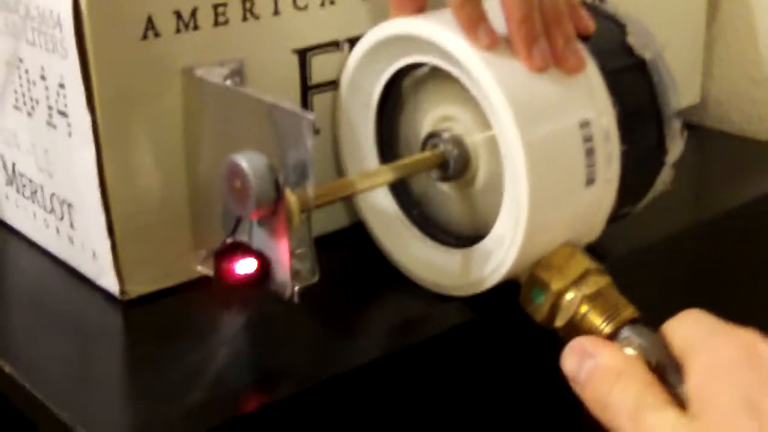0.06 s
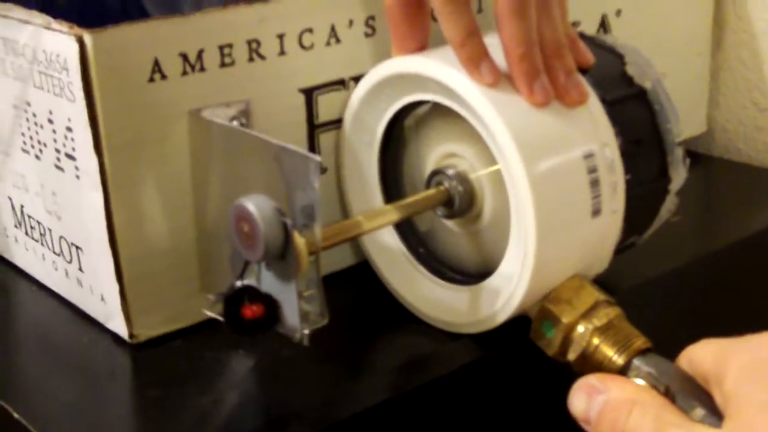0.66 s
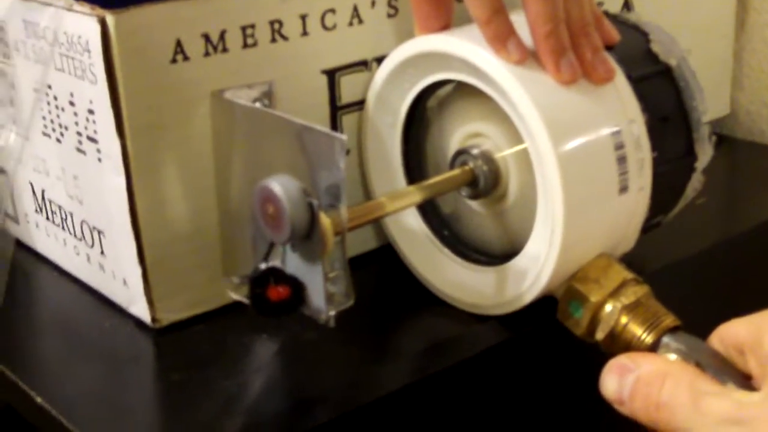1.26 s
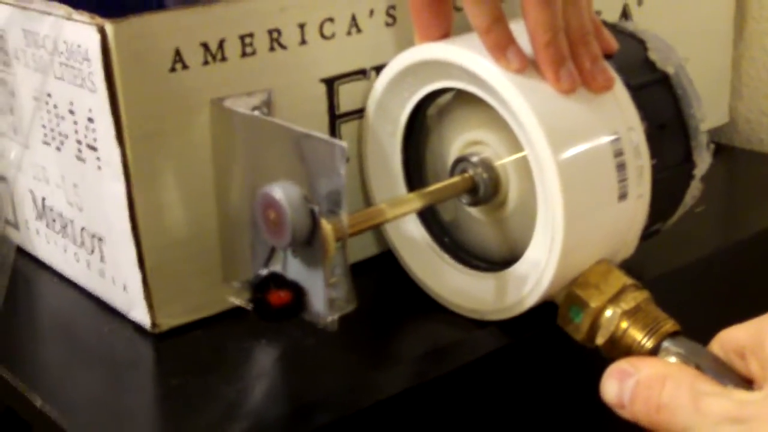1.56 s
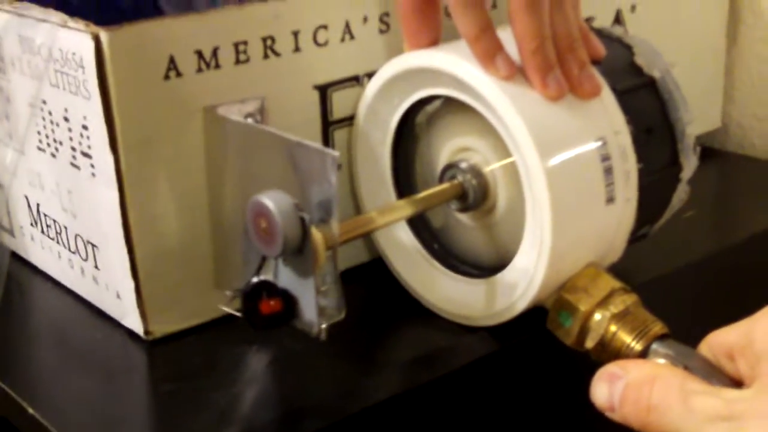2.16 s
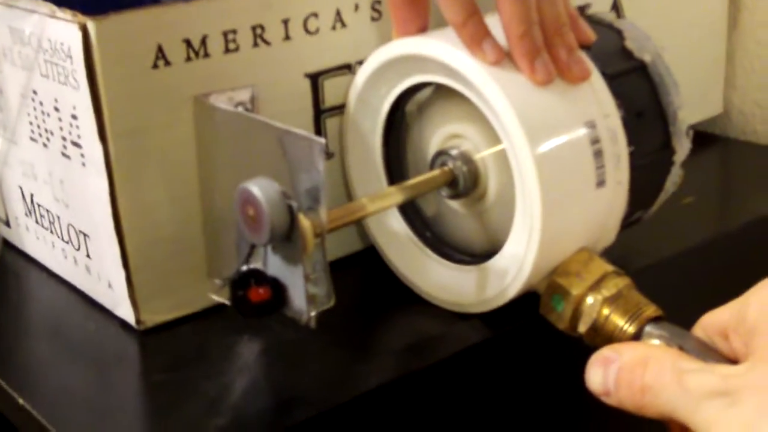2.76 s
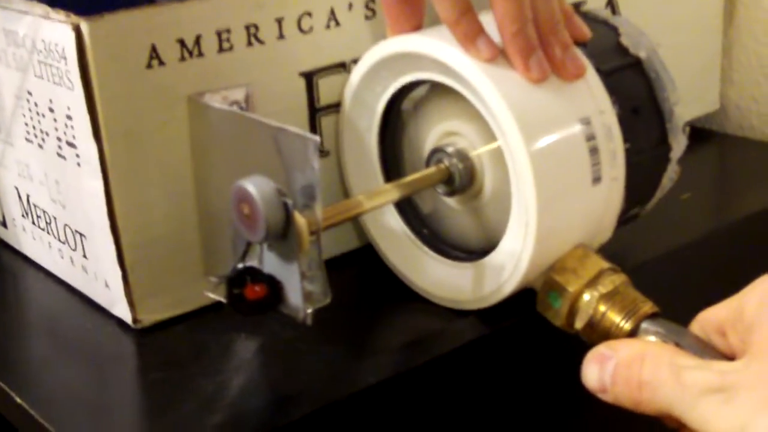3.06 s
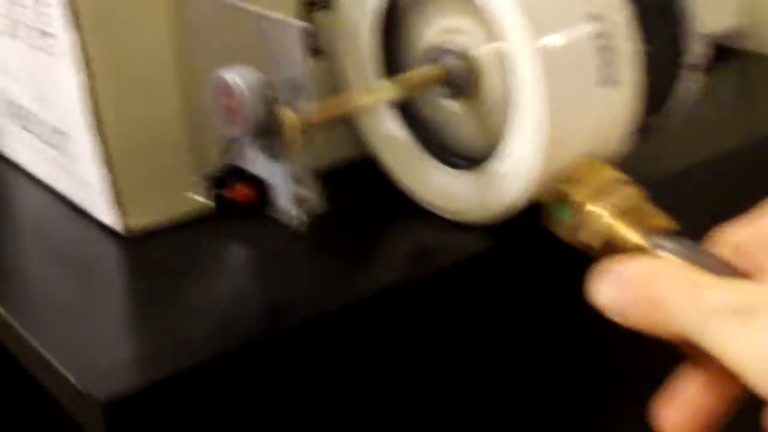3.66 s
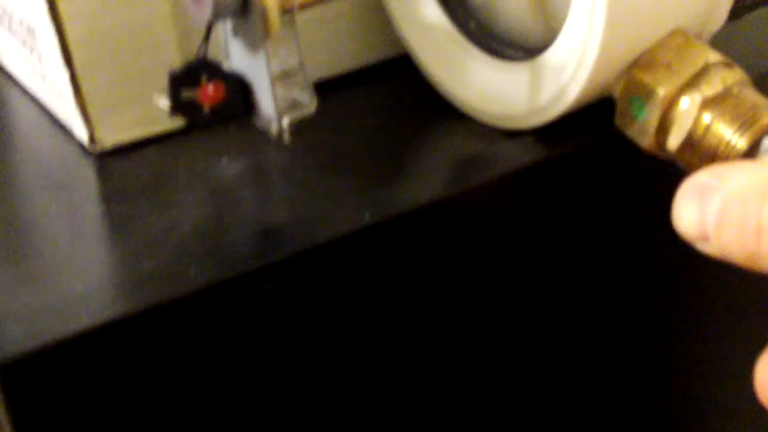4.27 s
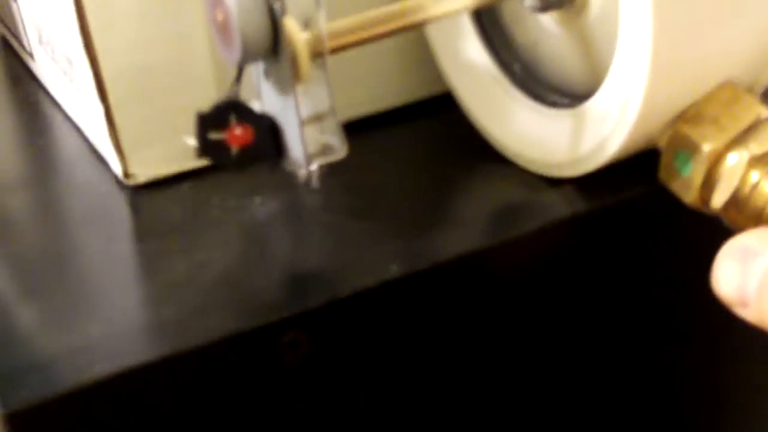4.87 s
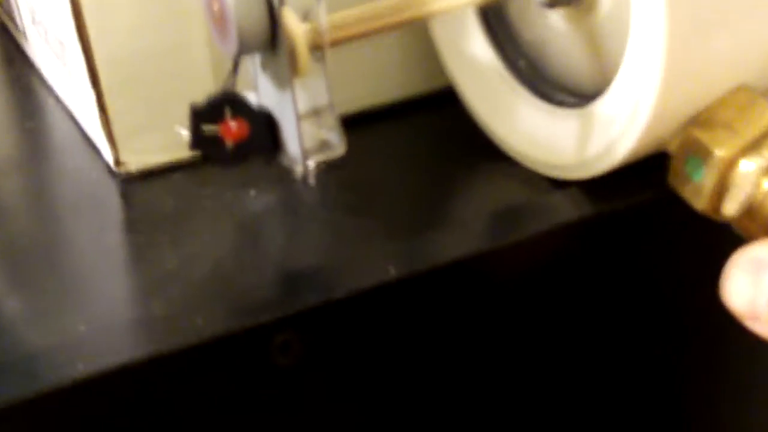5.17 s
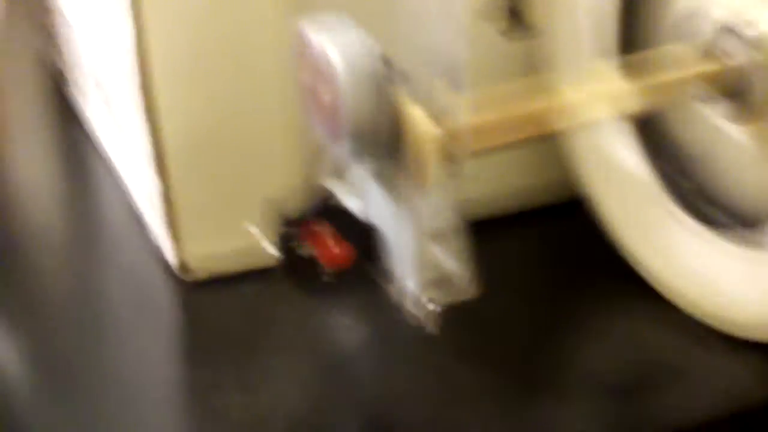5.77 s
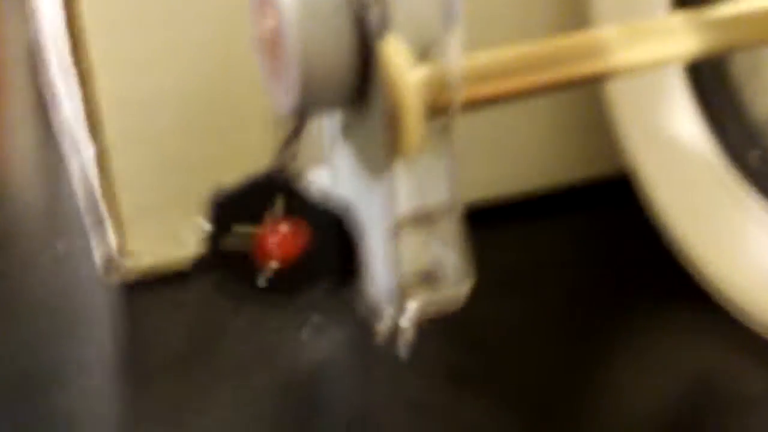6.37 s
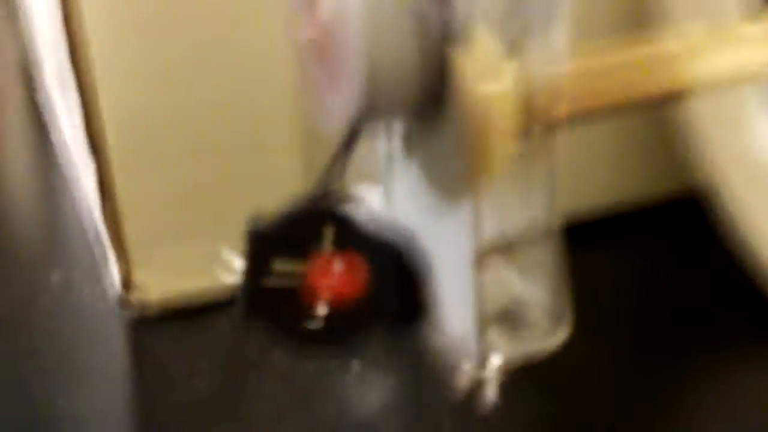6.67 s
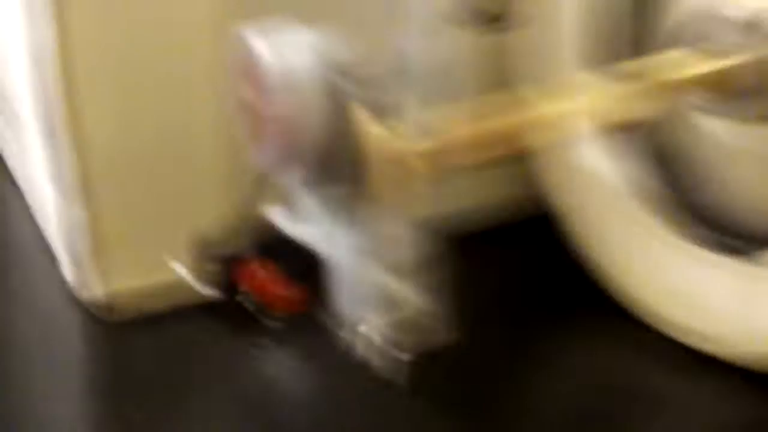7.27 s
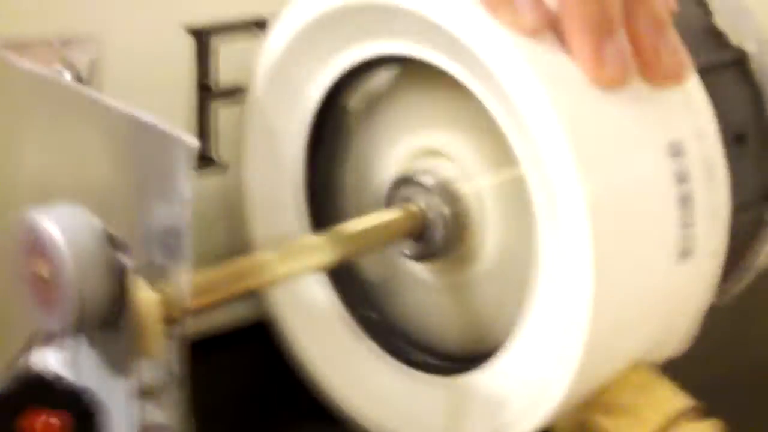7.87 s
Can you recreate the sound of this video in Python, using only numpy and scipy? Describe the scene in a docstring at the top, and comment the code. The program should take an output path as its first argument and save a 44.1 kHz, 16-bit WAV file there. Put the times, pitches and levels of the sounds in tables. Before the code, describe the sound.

A strong, steady jet of air drives a small plastic paddle wheel on an indoor workbench. Beneath the hiss, a thin whine rises quickly, peaks, and gradually drops in pitch. The handheld microphone dips and comes close to the housing, so the hiss changes tone and swells slightly. Toward the end, the shaft faintly shakes a cardboard box and a distant motor hums, barely audible.

```python
"""On a workbench, compressed air hisses from a hose fitting into a plastic housing and spins a small
paddle wheel. The blades chop the jet into a thin whine that climbs, then slowly sags; the shaft shakes
the cardboard box that carries it. A motor, likely the compressor, cuts in faintly. The microphone starts
at arm's length, dips, and moves close to the housing, where the hiss is loudest and just clips."""
import sys
import numpy as np
from scipy import signal
from scipy.fft import rfft, irfft, next_fast_len
from scipy.io import wavfile
from scipy.ndimage import map_coordinates

SR = 44100
rng = np.random.default_rng(int(sys.argv[2]) if len(sys.argv) > 2 else 0)


def store_wav(level_fs):
    """Save 16-bit WAV to argv[1]."""
    pcm = np.round(np.clip(np.atleast_2d(level_fs), -1, 1) * 32767)
    wavfile.write(sys.argv[1], SR, pcm.T.astype(np.int16))


N = 354123
TIME = np.arange(N) / SR

# jet strength at the microphone: (time [s], level [dB])
JET_LEVEL = [(0.0, -14), (0.5, -12.6), (0.72, -13.5), (1.0, -12), (2.0, -12.5), (3.2, -13), (4.15, -11),
             (4.95, -12), (5.5, -11), (6.4, -9), (6.75, -9.5), (7.05, -10), (7.35, -11.3), (8.03, -11.3)]
# wheel speed: (time [s], blade-passing rate [Hz])
BLADE_RATE = [(0.0, 226), (0.13, 325), (0.27, 409), (0.45, 388), (0.6, 393), (0.78, 365), (1.1, 411),
              (2.1, 537), (2.3, 529), (2.75, 477), (3.44, 440), (4.05, 437), (4.47, 409), (4.8, 417),
              (5.0, 400), (5.46, 375), (5.85, 382), (6.46, 352), (6.78, 328), (7.2, 314), (8.03, 295)]
# microphone path: (time [s], place [0 far, 1 low, 2 near, 3 close], hand sway [0-1])
MIC_PATH = [(0, 0, 0.34), (3.3, 0, .3), (4.0, .9, 1), (5.0, 1.27, 0.74), (5.5, 1.76, 1), (6.15, 2.5, 1),
            (6.4, 3, 0.8), (7.0, 3, .7), (7.3, 1.5, 1), (7.65, 2, 0.99), (8.03, 2.2, 1)]


def amp(db):
    """Decibels to gain."""
    return 10 ** (np.asarray(db) / 20)


def unit_rms(x):
    """Scale to rms 1."""
    return x / np.sqrt(np.mean(x ** 2) + 1e-20)


def curves(rows, time_s):
    """Each column after the first, interpolated at time_s."""
    knots_s, *columns = np.transpose(rows)
    return [np.interp(time_s, knots_s, column) for column in columns]


def response_db(points, hz):
    """(frequency [Hz], level [dB]) points joined on a log axis."""
    knots_hz, db = np.transpose(points)
    return np.interp(np.log(hz + 1), np.log(knots_hz + 1), db)


def bells_db(rows, hz):
    """Sum of bell-shaped peaks and notches."""
    return sum(db * 2 ** -(2 * (hz - centre_hz) / width_hz) ** 2 for centre_hz, width_hz, db in rows)


def wobble(knots_per_s, time_s=TIME):
    """Smooth random curve, rms near 1."""
    knots = rng.standard_normal(int(N * knots_per_s / SR) + 4)
    return map_coordinates(knots, [time_s * knots_per_s], mode="nearest")


def hiss():
    """Jet noise rings the housing and changes colour as the microphone moves."""
    # jet turbulence: (frequency [Hz], relative density [dB])
    jet_spectrum = [(70, -78), (130, -50), (200, -44), (300, -31), (450, -26.5), (600, -16.5), (740, -8.5),
                    (950, -5.5), (1300, -5), (1700, 1.7), (3000, 0.5), (6000, -3), (10000, -0.73),
                    (15200, -11.5)]
    # housing resonances and dips: (centre [Hz], width [Hz], gain [dB])
    housing_modes = [(1580, 45, 2), (1847, 43, 2), (2166, 127, -4), (2514, 165, 5), (2806, 170, -4),
                     (3360, 140, 1), (3880, 350, -2), (5000, 170, 2.5), (5870, 700, -1.5)]
    hz, frame_s, noise = signal.stft(rng.standard_normal(N), SR, nperseg=2048)
    source_db = response_db(jet_spectrum, hz) + bells_db(housing_modes, hz)
    path_db = bench_colour_db(hz, frame_s, slide_per_place=0.032)
    path_db += echo_combs_db(hz, frame_s, drift_s=0.00005, treble_hz=4000)
    gain = amp(source_db[:, None] + path_db)
    gain /= np.sqrt(np.mean(gain ** 2, axis=0))  # equal power per frame
    air = unit_rms(signal.istft(noise * gain, SR)[1][:N])
    flutter_db = 0.19 * wobble(14) + 0.31 * wobble(60)
    return air * amp(curves(JET_LEVEL, TIME)[0] + flutter_db)


def bench_colour_db(hz, frame_s, slide_per_place):
    """Peaks and notches from bench and box slide in pitch and crossfade along the microphone path."""
    # peaks and notches at each place: (centre [Hz], width [Hz], gain [dB])
    far = [(576, 170.0, -2.3), (1300, 570, -1.9), (1480, 66, -8), (2190, 290, -4), (2820, 90.0, -4),
           (3715, 230, -7), (4050, 104, -5), (4250, 3800, 3), (5125, 240, 3.5), (6350, 200, 4),
           (7110, 270, -5.5), (8900, 300.0, 3), (9400, 230.0, -4.5), (10400, 910.0, 1.8), (11100, 390.0, 0),
           (12827, 530.0, 2), (14556, 1810.0, 2.5)]
    low = [(597, 450, -2.5), (2430, 240, -6), (2930, 1370, 4), (3000, 350, -6), (4300, 190.0, 5.5),
           (5190, 150, 5.5), (5800, 190.0, 4), (7000, 300, 1.5), (7200, 120.0, -6), (8800, 280, 5),
           (10000, 1300, -3.5), (12800, 320.0, 5), (13056, 370.0, 2)]
    near = [(927, 79, 4), (1460, 230, 3.5), (1830, 200, -2.5), (2340, 440, 2), (2708, 100.0, -4),
            (3057, 400, 3), (4673, 130.0, -4), (5253, 290.0, -7), (5940, 400, -9), (6323, 110, -16),
            (6410, 1350, 7.5), (8050, 4300, -2), (9270, 190, 5), (10800, 590, 5), (13677, 3500, 5)]
    close = [(603, 410, 3), (1470, 530, 4.5), (1740, 130, -7), (2500, 1000, 4), (2580, 290, -7),
             (3700, 190, 5.5), (4717, 4200, -1), (5170, 190, -10), (5731, 400.0, -3.5), (7130, 320.0, 5.5),
             (7911, 250.0, -3), (9500, 380.0, -3), (10860, 510, 6.5), (12360, 650.0, 7), (14100, 630.0, 7)]
    place = curves(MIC_PATH, frame_s)[0]
    colour_db = 0
    for k, peaks in enumerate([far, low, near, close]):
        weight = np.clip(1 - abs(place - k), 0, 1)
        slid_hz = np.outer(hz, 1 + slide_per_place * (place - k))
        colour_db += weight * np.interp(slid_hz, hz, bells_db(peaks, hz))
    return colour_db


def echo_combs_db(hz, frame_s, drift_s, treble_hz):
    """Each echo combs the spectrum, mostly in the treble; the combs slide as the hand sways."""
    # bench, box and wall echoes: (delay [s], ripple at full weight [dB])
    echoes = [(.0008, 1.5), (.0013, 0.5), (.00175, 1.4), (.00436, 2.5)]
    sway = curves(MIC_PATH, frame_s)[1]
    weight = sway * (hz / (hz + treble_hz))[:, None]
    combs_db = 0
    for delay_s, ripple_db in echoes:
        swayed_s = delay_s + drift_s * sway * wobble(1.594, frame_s)
        combs_db += ripple_db * np.cos(2 * np.pi * np.outer(hz, swayed_s))
    return weight * combs_db


def whine(waver, shimmer_db, wander_db, spin_up_s, spin_up_db):
    """Blades chop the jet; three harmonics follow its strength and glide through resonances."""
    # housing radiation of a blade tone: (frequency [Hz], level re jet [dB])
    radiation = [(220, -55), (330, -49), (450, -40.5), (620, -37.5), (730, -23.5), (1000, -25.5),
                 (1200, -26), (1600, -19.5)]
    # narrow resonances and dips: (centre [Hz], width [Hz], gain [dB])
    tone_modes = [(325, 25, -5), (362, 32, 5), (434, 20, 5.5), (505, 38, 5), (532, 16, -9), (620, 20, -6),
                  (854, 50, -2), (912, 50, 2.5), (1002, 78, 4), (1100, 40, 4), (1362, 88, 6),
                  (1475, 35, -10), (1612, 83, 6)]
    # blade harmonics 1-3: (level [dB], tilt factor [1])
    harmonics = [(0.0, -0.022), (-0.5, -1.2), (0.1, 0.73)]
    # whine colour, positive favours harmonic 3 over 2: (time [s], tilt [dB])
    tilt = [(0, 3), (0.35, 3), (0.6, -3.5), (0.95, -2.5), (1.4, -0.5), (2.1, 3.5), (2.45, -6), (3.4, 1),
            (6.1, 2), (6.8, -0.5), (7.3, 5)]
    blade_hz = curves(BLADE_RATE, TIME)[0]
    tilt_db = curves(tilt, TIME)[0]
    drive_db = curves(JET_LEVEL, TIME)[0] - spin_up_db * np.clip(1 - TIME / spin_up_s, 0, 1)
    phase = 2 * np.pi * np.cumsum(blade_hz * (1 + waver * wobble(45))) / SR
    tone = 0
    for k, (level_db, tilt_factor) in enumerate(harmonics, 1):
        body_db = response_db(radiation, k * blade_hz) + bells_db(tone_modes, k * blade_hz)
        turbulence_db = shimmer_db * wobble(30) + wander_db * wobble(7)
        harmonic_db = drive_db + level_db + tilt_factor * tilt_db + body_db + turbulence_db
        tone += amp(harmonic_db) * np.sin(k * phase)
    return np.sqrt(2) * tone


def shaft(blades, shake_db):
    """The unbalanced shaft shakes the box; its orders swell as they cross a resonance."""
    # cardboard box resonances: (centre [Hz], width [Hz], gain [dB])
    box_modes = [(161, 16, 10.5), (323, 69, 27)]
    shaft_hz = curves(BLADE_RATE, TIME)[0] / blades
    phase = 2 * np.pi * np.cumsum(shaft_hz) / SR
    hum = 0
    for order in (3, 5, 6):
        hum += amp(shake_db + bells_db(box_modes, order * shaft_hz)) * np.sin(order * phase)
    return amp(2 * wobble(13)) * hum


def compressor(start_s, rise_s, shaft_hz):
    """A distant motor comes up to speed and hums steadily."""
    # motor hum: (shaft order [1], level [dB])
    orders = [(3, -65.5), (5, -57.5), (9, -55.5)]
    run_up = np.clip((TIME - start_s) / rise_s, 0, 1)
    rate_hz = shaft_hz * run_up * (1 + 0.00092 * wobble(6))
    phase = 2 * np.pi * np.cumsum(rate_hz) / SR
    hum = sum(amp(db + wobble(5)) * np.sin(order * phase) for order, db in orders)
    return np.sqrt(2) * run_up ** 2 * hum


def low_pass(x, top_hz):
    """Brick-wall cut above top_hz."""
    size = next_fast_len(N + SR // 2)
    passband = np.fft.rfftfreq(size, 1 / SR) < top_hz
    return irfft(rfft(x, size) * passband, size)[..., :N]


def scene():
    """Hiss, wheel and motor, alike in both channels."""
    wheel = whine(waver=0.0015, shimmer_db=1.6, wander_db=1.56, spin_up_s=0.35, spin_up_db=6)
    wheel += shaft(blades=8, shake_db=-85.5)
    mono = hiss() + wheel + compressor(start_s=5.7, rise_s=0.22, shaft_hz=58.6)
    return np.array([mono, mono])


def record(dry):
    """The tallest peaks are clipped; a band limit follows."""
    return low_pass(np.clip(dry, -1.03, 1.03), top_hz=15380)


dry = scene()
out = record(dry)
store_wav(out)
```